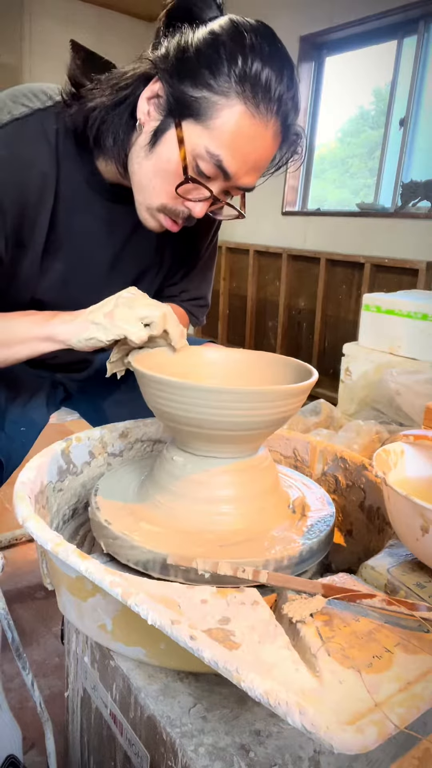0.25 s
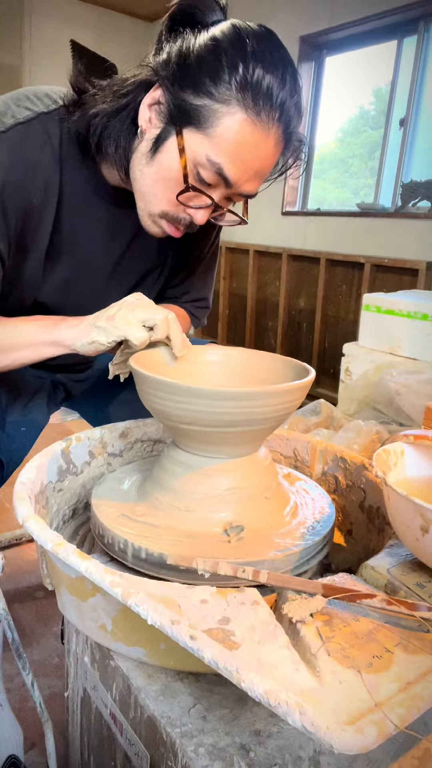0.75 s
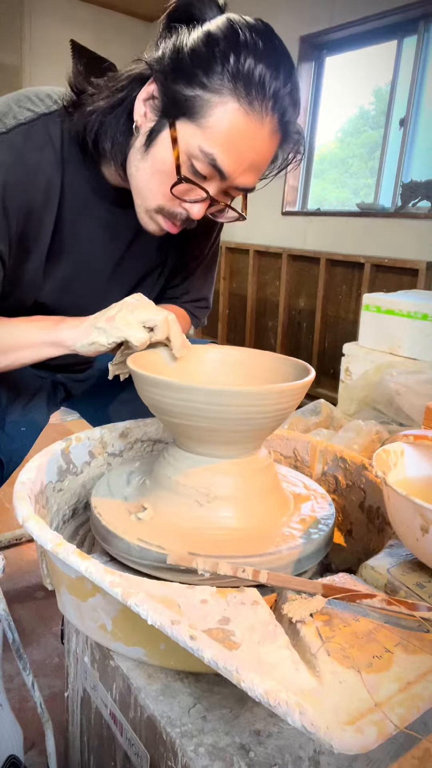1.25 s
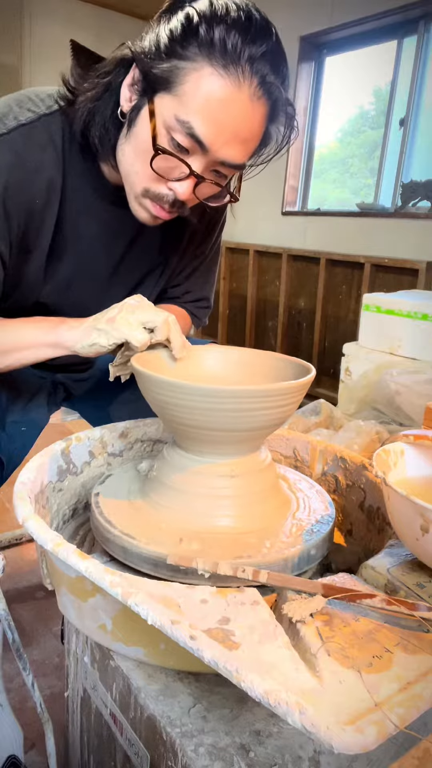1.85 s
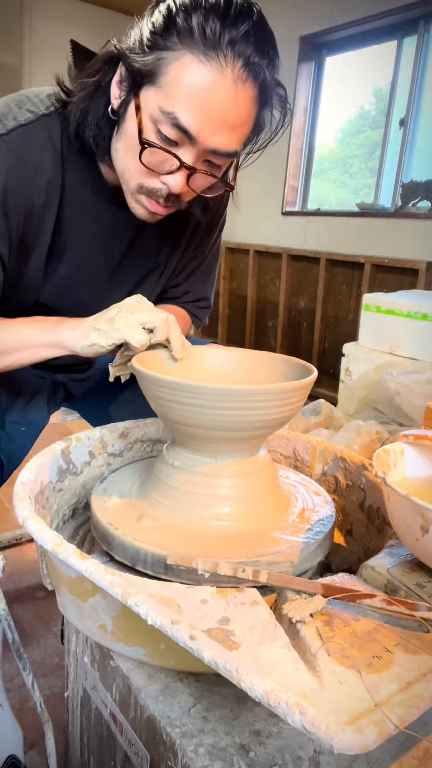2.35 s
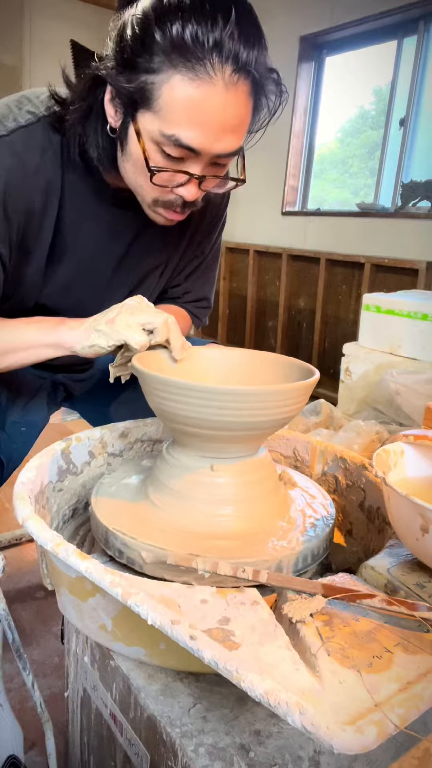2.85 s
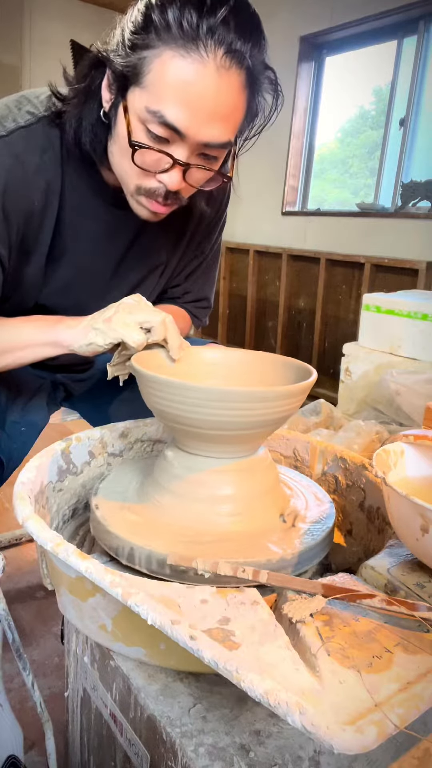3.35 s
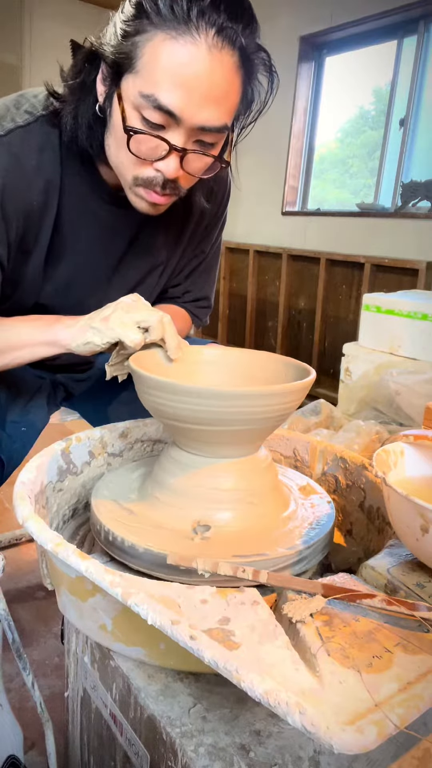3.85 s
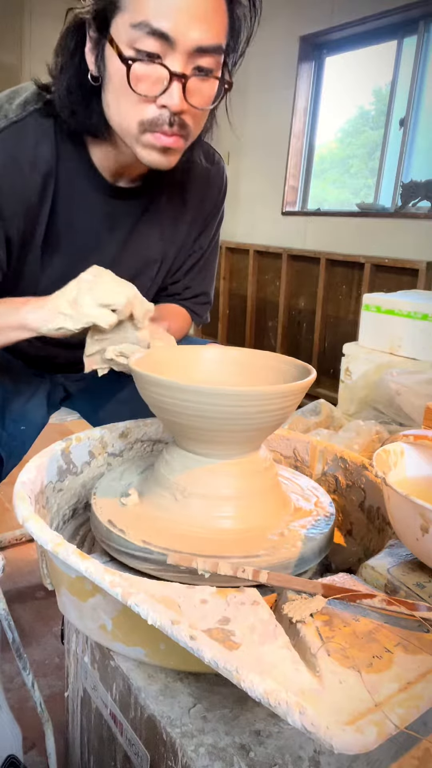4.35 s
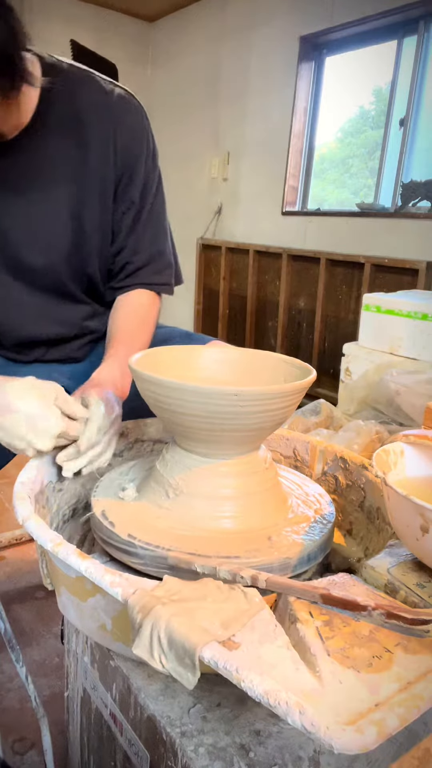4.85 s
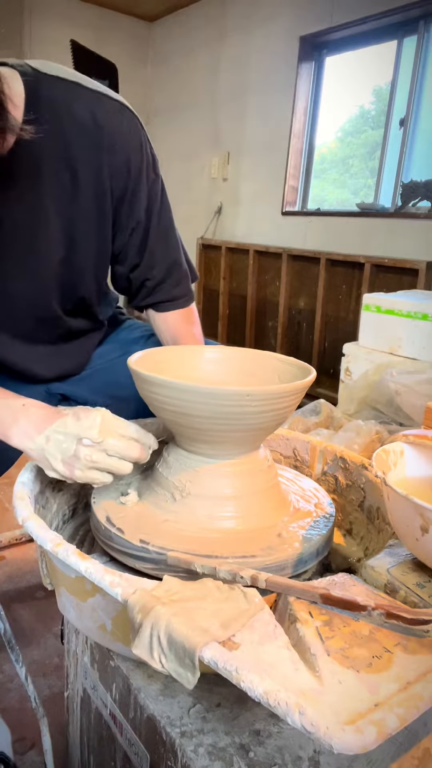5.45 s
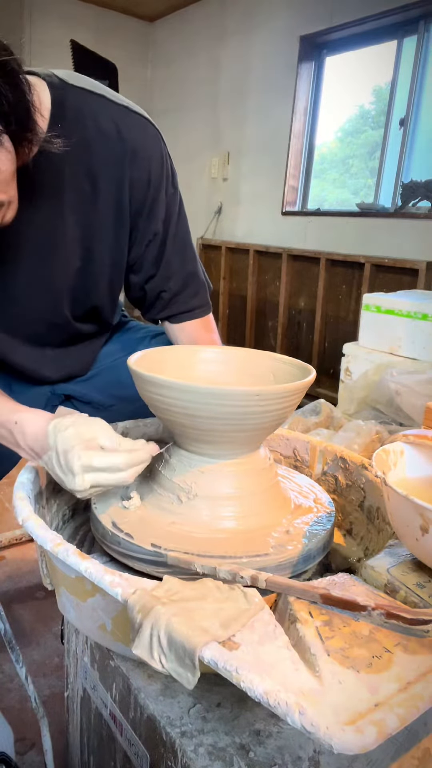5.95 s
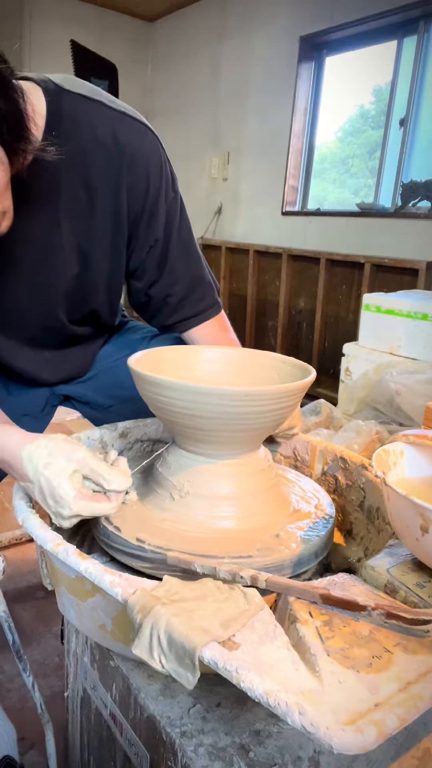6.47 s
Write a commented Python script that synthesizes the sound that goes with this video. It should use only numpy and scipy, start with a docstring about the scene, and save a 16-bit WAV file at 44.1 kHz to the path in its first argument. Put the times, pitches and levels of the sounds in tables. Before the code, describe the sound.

Close low motor hum and soft whirr in a small wooden room, brief wet swipes on clay, later knocks, a tool dropped in the tray, wire ticks.

```python
"""First comes the steady hum of an electric potter's wheel, close to a phone in a small wooden shed, with wet swipes.
Hum and rotor tones are wavering sines; whirr and rattle are noise through housing and pan resonances.
Fingers and cloth are shaped noise. The potter bumps and leans on the splash pan, damping its rattle, drops a tool
into it, shuffles about and flicks a wire toggle: gritty bursts that ring resonant modes, answered by the shed."""
import sys
import numpy as np
from scipy import signal
from scipy.fft import rfft, irfft, next_fast_len
from scipy.io import wavfile
from scipy.ndimage import map_coordinates

SR = 44100
rng = np.random.default_rng(int(sys.argv[2]) if len(sys.argv) > 2 else 0)


def wav_record(signal):
    """Record a signal, one row per channel, as 16-bit PCM in the file named by sys.argv[1]."""
    frames = np.transpose(np.atleast_2d(signal))
    bounded = np.clip(frames, -1, 1)
    # unit amplitude maps onto the largest positive 16-bit level
    quanta = np.round(bounded * 32767).astype(np.int16)
    wavfile.write(sys.argv[1], SR, quanta)


def undo_db(level):
    """Turn decibels back into plain size, where 20 dB means ten times bigger."""
    steps = np.asarray(level, float) / 20
    return 10 ** steps


N = 295911

# high hiss in the stereo difference alone, relative spectrum: f/Hz, level/dB
HISS_SPECTRUM = [(8000, -51), (10000, 0.5), (11000, 2.5), (15000, -6.5), (15800, -41)]
# stereo spread; above about 12 kHz the sum falls nearly silent while the difference goes on: f/Hz, sum
# level/dB, difference level/dB, share of the difference leaning left (clipped to -1..1)
STEREO_RESPONSE = [(60, -0.5, -41, -1.2), (126, -0.5, -42.5, -1.2), (169, 4.5, -28.5, -.8),
                   (240, -6, -30.5, -0.67), (378, -6.5, -17.5, -.8), (517, -3.5, -13.5, -.8),
                   (690, 0, -10.5, -0.75), (1000, 1.5, 1, -0.4), (1750, 5.5, -4, 0.53),
                   (2770, 10, 0.5, -0.2), (4520, 4, 1, -0.32), (5520, 0.5, -19, 0),
                   (7450, 6.5, 3.5, -0.0075), (9500, 1.5, 0.5, -0.061), (11470, -5.5, 4, 0),
                   (11770, -4, 6, 0), (12400, -60, 2.5, 0), (15500, -56, -4, 0)]
# decay of the wooden shed, before each source scales it: f/Hz, t60/s
SHED_DECAY = [(200, .25), (1000, .26), (2500, .27), (6000, .2), (12000, .13)]
# weight resting on the pan: t/s, share 0-1
PAN_LEAN = [(4.49, 0), (4.51, 0.35), (6.0, 0.4), (6.25, 0.18)]
# resonances of the loose pan: f/Hz, width/Hz, relative level/dB
RATTLE_PEAKS = [(288, 5, 0), (332, 6, -7), (305, 40, -21)]
# swells of the pan rattle, about once a turn of the wheel and when jolted: t/s, level/dB with the pan free
RATTLE_SWELLS = [(.25, -47), (1.12, -49.5), (1.57, -50.5), (2.05, -43), (2.93, -39), (3.85, -46),
                 (4.33, -55.5), (5.06, -43), (6.24, -46.5)]
# housing resonances with the pan free: f/Hz, width/Hz, relative level/dB
FREE_HOUSING = [(142, 26.3, -4), (490, 30, 1), (711, 130, -17), (1525, 112, -20.5), (1854, 44, -17),
                (2102, 70, -12.5), (2261, 93, -19), (2877, 73, -23.5), (3600, 160, -23.5), (4500, 200, -27),
                (5220, 350, -19), (5604, 480, -17), (6160, 570, -25), (7720, 370, -25)]
# housing resonances with the pan held: f/Hz, width/Hz, relative level/dB
HELD_HOUSING = [(140, 50, -11.5), (510, 58, -1), (795, 100, -14), (1630, 110, -14.5), (1890, 84, -10.5),
                (1960, 68, -19), (2320, 160, -34), (3060, 97, -21), (3650, 360, -23), (4500, 360, -22),
                (5200, 1100, -18), (5750, 550, -29.5), (6620, 300, -21), (8030, 650, -16)]
# broad whirr under the resonances, relative spectrum: f/Hz, level/dB
AIR_SPECTRUM = [(20, -27), (45, -5.5), (80, -4), (125, -9.5), (180, -18.5), (250, -10), (370, -11.5),
                (600, -20), (1000, -32), (3000, -35), (9000, -32), (10250, -31.5), (10450, -43),
                (16000, -66.5)]
# sleeves and hands shuffling on the pan: middle t/s, peak level/dB, half length/s
CLOTH_SHUFFLES = [(.52, -67.5, 0.16), (4.12, -65.5, 0.22), (4.7, -74, 0.18), (5.33, -59.5, 0.17)]
# dull cloth, relative spectrum: f/Hz, level/dB
CLOTH_SPECTRUM = [(250, -30), (500, -10), (1000, -5), (1900, 0), (2400, -5), (3200, -18), (6000, -30),
                  (14000, -60)]
# ticks and brushes on the wire toggle: t/s, drive level/dB, brightness f/Hz, contact t60/s
TOGGLE_TICKS = [(5.729, -29, 25200, 0.015), (5.74, -41.5, 8900, 0.11), (5.763, -38, 4020, 0.017),
                (5.824, -42, 2970, 0.015)]
# modes of the toggle: f/Hz, relative level/dB, t60/s
TOGGLE_MODES = [(1647, -12, .06), (2110, -12, .04), (2153, -9, .07), (2471, -8, .05), (3400, -2, .008),
                (5500, 4, .02)]
# tool landing in the tray, and light touches on it: t/s, drive level/dB, brightness f/Hz, contact t60/s
TOOL_DROPS = [(4.857, -43.5, 25000, 0.015), (5.022, -18.5, 14400, 0.067), (5.029, -20, 4930, 0.2),
              (6.022, -46, 6000, 0.069)]
# modes of the tray: f/Hz, relative level/dB, t60/s
TRAY_MODES = [(300, -24, .04), (711, -15, .035), (1080, -8, .025), (1190, 2, .05), (1440, -3, .02),
              (1780, -2, .02), (2080, 0, .025), (2239, -5, .06), (2608, -4, .02), (2810, -6, .025),
              (3400, -6, .01), (5660, -7, .008), (7500, -4, .006)]
# knocks on the wheel's frame: t/s, drive level/dB, brightness f/Hz, contact t60/s
FRAME_BUMPS = [(4.499, -26.5, 2200, 0.022), (4.505, -16, 950, 0.02), (4.512, -32, 4500, 0.12),
               (4.53, -43.5, 2560, 0.31), (5.623, -40, 2500, 0.056), (5.655, -37, 200, 0.054),
               (6.105, -41, 596, 0.038), (6.14, -35.5, 350, 0.13)]
# modes of the frame: f/Hz, relative level/dB, t60/s
FRAME_MODES = [(135, -10, .07), (210, -12, .07), (500, 2, .04), (764, 0, .04), (1010, -9, .03),
               (1500, 2, .05), (1620, -2, .04), (1970, -2, .04), (2210, -4, .04), (3000, -9, .01)]
# wet finger swipes: t/s, level/dB, rise/s, t60/s
WET_SWIPES = [(0.001, -47.5, 0.001, 0.25), (0.171, -47.5, 0.003, 0.28), (0.183, -43, 0.009, 0.35),
              (0.283, -46.5, 0.0026, 0.21), (0.294, -42, 0.0035, 0.22), (0.347, -49.5, 0.016, 0.14),
              (1.03, -36.5, 0.0053, 0.17), (1.109, -49.5, 0.0081, 0.2), (6.683, -42, 0.005, 0.51)]
# wet fingers on clay, relative spectrum: f/Hz, level/dB
WET_SPECTRUM = [(200, -25), (450, 4.5), (1000, -8.5), (1900, -5), (2800, -5.5), (3400, -9), (4000, -4.5),
                (4700, -9), (6400, -2), (7500, -13), (10000, -12.5), (11500, -17.5), (15000, -19),
                (16000, -81)]
# motor tones: f/Hz, rms level/dB, change at full lean/dB, waver/dB
MOTOR_TONES = [(74.9, -62, 5, 2), (126, -69, 5.5, 3.5), (208.7, -67.5, -19, 4), (402, -57.5, -18.5, -2.5),
               (473, -53.5, -2, 1), (528, -69, 5, 4), (670, -74.5, -1, 3), (720.4, -68, -2.5, 3),
               (780, -72.5, -6, 2), (2015, -81.5, 10, -1.5), (2043, -73, 1, 3.5), (2070, -73, -11, 3.5),
               (2111, -69, -22, 0), (2266, -82.5, -7.5, -3)]
# slow swell of one rotor tone: tone f/Hz, beat f/Hz, depth 0-1, loudest at t/s
ROTOR_BEAT = (473.7, 0.45, 0.3, 0.87)
# pressure on clay or pan that makes the hum louder: start t/s, end t/s, gain level/dB, release/s
HUM_PRESSES = [(-.2, .6, 1.05, 0.78), (4.462, 5.96, 4, .43), (4.502, 4.76, 2.5, .1)]
# cut in the sound, where the hum jumps in phase with a momentary gap: t/s, phase step/rad, length/s
HUM_CUT = (4.496, -1.08, 0.0046)
# brief dip of the hum: t/s, level/dB, half length/s
HUM_DIP = (1.115, -3.1, 0.019)


def unit(x):
    """Scale to rms 1."""
    return x / np.sqrt(np.mean(x ** 2) + 1e-20)


def along(points, hz):
    """Each column after the frequency, read on a log axis."""
    f, *columns = np.transpose(points)
    return np.squeeze([np.interp(np.log(hz + 1), np.log(f + 1), column) for column in columns])


def wobble(rate):
    """A smooth random curve, rate knots a second."""
    knots = rng.standard_normal(int(N * rate / SR) + 4)
    return map_coordinates(knots, [np.arange(N) * rate / SR])


def filtered(x, response):
    """x through a complex response of frequency."""
    m = next_fast_len(x.shape[-1] + SR // 2)
    spectrum = rfft(x, m) * response(np.fft.rfftfreq(m, 1 / SR))
    return irfft(spectrum, m)[..., :x.shape[-1]]


def noise(gain):
    """Noise of rms 1 with the given gain over frequency."""
    return unit(filtered(rng.standard_normal(N), gain))


def coloured(spectrum):
    """Noise of rms 1 following a spectrum table."""
    return noise(lambda f: undo_db(along(spectrum, f)))


def peaks(table):
    """Gain of independent resonances with steep skirts, summed in power."""
    def gain(f):
        return np.sqrt(sum(undo_db(db) ** 2 / (1 + ((f - centre) / (width / 2)) ** 2) ** 1.37
                           for centre, width, db in table))
    return gain


def pan_lean():
    """Share of weight on the pan, one value per sample."""
    s, share = np.transpose(PAN_LEAN)
    return np.clip(np.interp(np.arange(N) / SR, s, share), 0, 1)


def struck(blows, modes, crack_db, low_hz):
    """A gritty contact rings the modes and is partly heard bare; soft ones lose the top, small bodies the bass."""
    out, t = np.zeros(N + SR), np.arange(SR // 2) / SR
    body = sum(undo_db(level - 60 * t / t60) * np.sin(2 * np.pi * hz * t) for hz, level, t60 in modes)
    body = body / np.linalg.norm(body)
    for s, db, bright_hz, t60 in blows:
        grit = undo_db(-60 * t / t60) * (1 - np.exp(-t / 0.00099)) * rng.standard_normal(len(t))
        bare = filtered(grit, lambda f: (1j * f / (700 + 1j * f)) ** 2)
        ringing = signal.fftconvolve(grit, body)[:len(t)]
        blow = ringing + undo_db(crack_db) * bare
        soft = filtered(blow, lambda f: (1j * f / (low_hz + 1j * f) / (1 + 1j * f / bright_hz)) ** 2)
        out[round(s * SR):][:len(t)] += undo_db(db) * soft
    return out[:N]


def top_hiss():
    """High hiss in the stereo difference alone, so the two sides cancel in the sum."""
    return undo_db(-71.0) * coloured(HISS_SPECTRUM) * [[1], [-1]]


def shed(x, t60_share):
    """The walls answer with a noise tail in which each frequency dies at its own speed."""
    hz, t, z = signal.stft(rng.standard_normal(SR // 2), SR, nperseg=256)
    t60 = t60_share * along(SHED_DECAY, hz)
    tail = signal.istft(z * undo_db(-60 * t / t60[:, None]), SR, nperseg=256)[1]
    return signal.fftconvolve(x, tail / np.linalg.norm(tail))[:N]


def stereo(x):
    """Both sides share the bass; higher up they differ by direction and by scattered sound."""
    def left_share(f):
        return np.clip(along(STEREO_RESPONSE, f)[2], -1, 1)

    def side_gain(f):
        return undo_db(along(STEREO_RESPONSE, f)[1])
    mid = filtered(x, lambda f: undo_db(along(STEREO_RESPONSE, f)[0]))
    direct = filtered(x, lambda f: side_gain(f) * left_share(f))
    scattered = filtered(shed(x, t60_share=0.4), lambda f: side_gain(f) * np.sqrt(1 - left_share(f) ** 2))
    return np.array([mid + direct + scattered, mid - direct - scattered])


def pan_rattle():
    """The loose pan shakes as resonant noise: quick swells fade over an idle rattle, and a resting hand damps both."""
    t, lean = np.arange(N) / SR, pan_lean()
    rise_s, fade_db_per_s = 0.11, 27.5
    swells = np.zeros(N)
    for s, db in RATTLE_SWELLS:
        rise = np.exp(-(np.minimum(t - s, 0) / rise_s) ** 2)
        swells += undo_db(db - fade_db_per_s * np.maximum(t - s, 0)) * rise
    shape = undo_db(-55 - 30 * lean) + swells * undo_db(-12 * lean)  # idle rattle, then swells
    return shape * undo_db(1.23 * wobble(6.5)) * noise(peaks(RATTLE_PEAKS))


def whirr():
    """Bearing and belt noise in the housing, whose resonances shift when the pan is held."""
    lean = pan_lean()
    drive = rng.standard_normal(N) * undo_db(0.45 * wobble(25))
    free = filtered(drive, peaks(FREE_HOUSING))
    held = filtered(drive, peaks(HELD_HOUSING))
    housing = (1 - lean) * free + lean * held
    direct = undo_db(-31.0) * housing + undo_db(-56.5) * coloured(AIR_SPECTRUM)
    # near surfaces comb the steady noise into fine fixed ripples
    return direct + undo_db(-5.5) * shed(direct, t60_share=0.91)


def cloth_shuffles():
    """Sleeves and hands rub as dull noise that swells over a faint idle level."""
    t = np.arange(N) / SR
    shape = undo_db(-75.5) + sum(undo_db(db) * np.exp(-((t - s) / half) ** 2) for s, db, half in CLOTH_SHUFFLES)
    return shape * coloured(CLOTH_SPECTRUM) * undo_db(0.89 * wobble(48))


def toggle_ticks():
    """The small wire toggle rings brightly, with little bass and a strong bare crack."""
    return struck(TOGGLE_TICKS, TOGGLE_MODES, crack_db=2, low_hz=700)


def tool_drop():
    """The tool lands with a sharp crack and rings the tray's modes."""
    return struck(TOOL_DROPS, TRAY_MODES, crack_db=4, low_hz=875)


def frame_bumps():
    """Bumps ring the wheel's heavier frame, which keeps more bass."""
    return struck(FRAME_BUMPS, FRAME_MODES, crack_db=-3.5, low_hz=90)


def wet_swipes():
    """Wet fingers on clay swell and fade as grainy hiss."""
    t, shape = np.arange(N) / SR, np.zeros(N)
    for s, db, rise, t60 in WET_SWIPES:
        since = np.maximum(t - s, 0)
        shape += undo_db(db - 60 * since / t60) * (1 - np.exp(-(since / rise) ** 2))
    grain = undo_db(1.18 * wobble(300) + 0.45 * wobble(60))
    return shape * coloured(WET_SPECTRUM) * grain


def hum():
    """Magnetic hum at twice the mains is a sine, louder under pressure, with one dip and one phase jump at a cut."""
    t = np.arange(N) / SR
    hum_hz, hum_db, press_rise_s = 99.96, -34.5, 0.057
    cut_s, phase_step, cut_length = HUM_CUT
    dip_s, dip_db, dip_half = HUM_DIP
    gap = 1 - 1.02 * np.exp(-((t - cut_s) / cut_length) ** 2)
    phase = 2 * np.pi * hum_hz * t + phase_step * (1 + np.tanh((t - cut_s) / cut_length)) / 2
    level_db = hum_db + dip_db * np.exp(-((t - dip_s) / dip_half) ** 2)
    for start, end, db, release in HUM_PRESSES:
        press = np.minimum((t - start) / press_rise_s, 1 - (t - end) / release)
        level_db += db * np.clip(press, 0, 1)
    return np.sqrt(2) * undo_db(level_db) * gap * np.sin(phase)  # root 2 turns rms into peak


def motor_tones():
    """Rotor and slot tones are sines that waver in level and phase; leaning shifts their levels and one beats."""
    t, lean, out = np.arange(N) / SR, pan_lean(), np.zeros(N)
    beat_tone_hz, beat_hz, depth, loudest = ROTOR_BEAT
    for hz, db, held_db, waver_db in MOTOR_TONES:
        beats = abs(hz / beat_tone_hz - 1) < .1
        swell = 1 + depth * np.cos(2 * np.pi * beat_hz * (t - loudest)) * beats
        phase = 2 * np.pi * (hz * t + rng.random()) + 0.1 * waver_db * wobble(6.3)
        level_db = db + held_db * lean + waver_db * wobble(3.955)
        out += undo_db(level_db) * swell * np.sin(phase)
    return np.sqrt(2) * out  # root 2 turns rms into peak


def scene():
    """The running wheel, with hands, and knocks answered by the shed, heard in stereo."""
    wheel = hum() + motor_tones() + whirr() + pan_rattle()
    hands = wet_swipes() + cloth_shuffles()
    knocks = frame_bumps() + toggle_ticks()
    drop = tool_drop()
    echoes = undo_db(1.0) * shed(knocks, t60_share=0.37) + undo_db(-7.5) * shed(drop, t60_share=0.88)
    return stereo(wheel + hands + knocks + drop + echoes) + top_hiss()


def roll_off(x):
    """The treble ends steeply here."""
    return signal.sosfilt(signal.butter(12, 15700, fs=SR, output="sos"), x)


def record(dry):
    """The finished mix as the phone keeps it."""
    return roll_off(dry)


dry = scene()
out = record(dry)
wav_record(out)
```